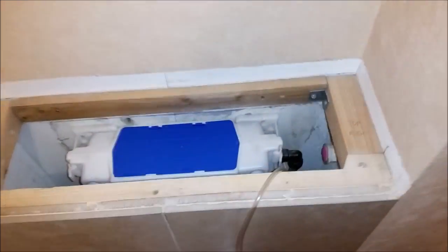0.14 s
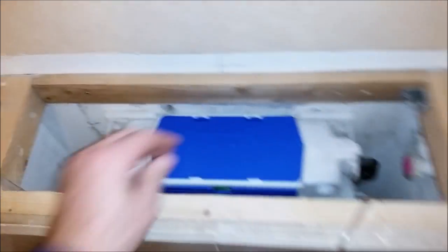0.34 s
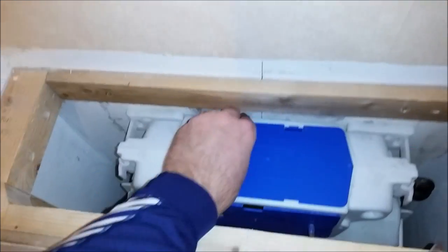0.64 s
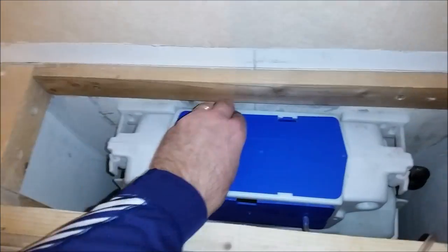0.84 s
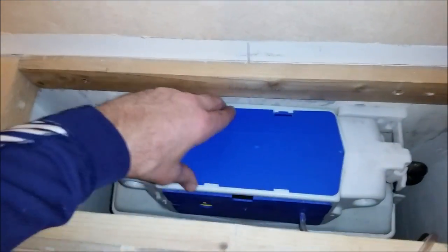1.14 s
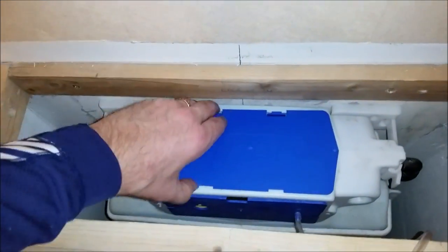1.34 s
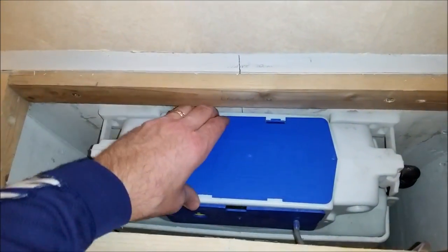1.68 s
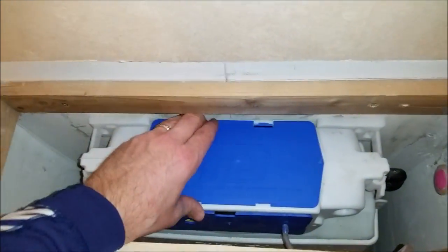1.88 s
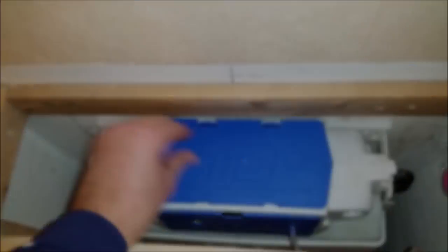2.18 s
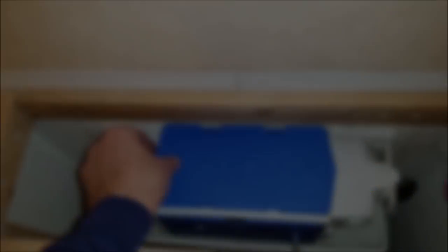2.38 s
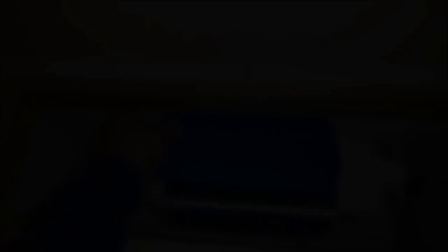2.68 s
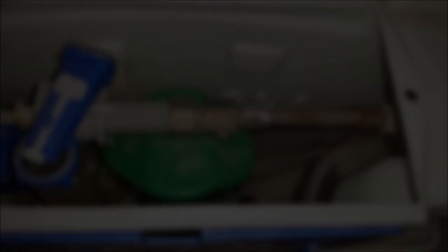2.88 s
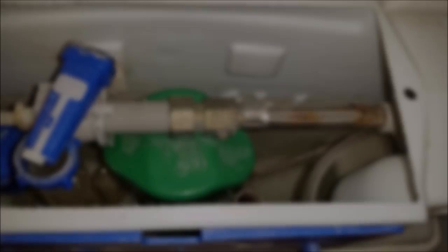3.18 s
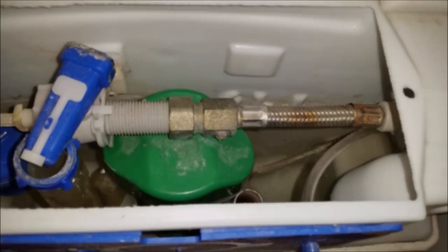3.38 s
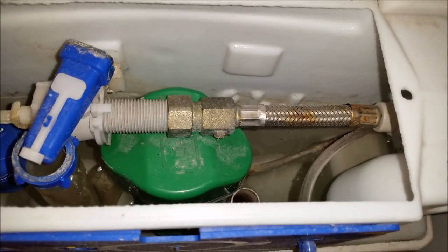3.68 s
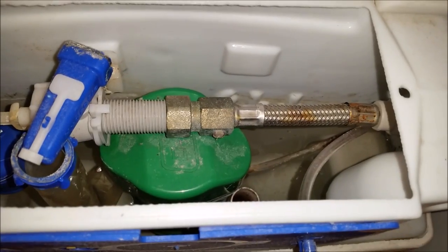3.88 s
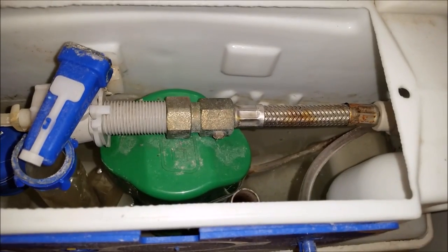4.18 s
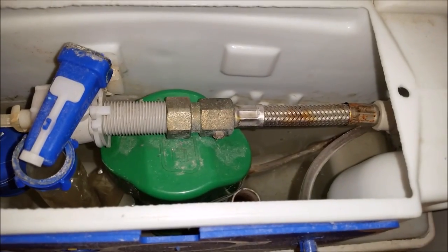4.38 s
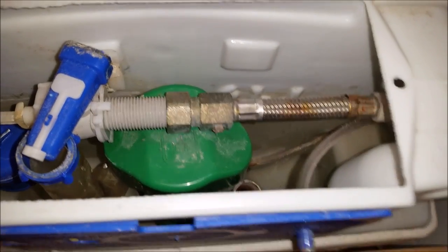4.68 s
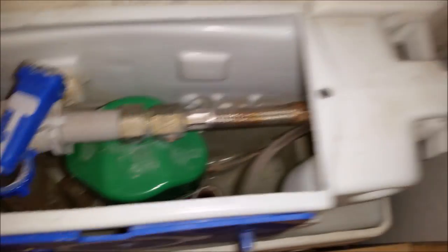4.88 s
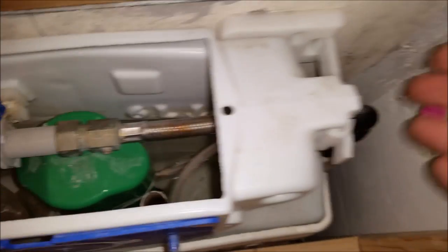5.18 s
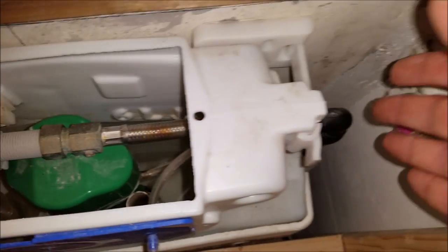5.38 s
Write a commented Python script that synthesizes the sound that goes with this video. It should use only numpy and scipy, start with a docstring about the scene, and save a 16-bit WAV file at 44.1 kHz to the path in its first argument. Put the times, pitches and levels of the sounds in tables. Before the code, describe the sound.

A plastic toilet cistern lid is worked loose by hand, close to the microphone in a small bathroom with a short echo. It opens with a soft hollow knock and a finger brush, then a light click at about 0.5 seconds. Near 1 second the lid rubs and knocks with a very short groan, followed by gentle, dull nudges. A firm knock lands at 2 seconds. The loudest clatter comes around 2.3 seconds and again from 2.7 to 2.8: quick cracks, hollow knocks and brief grating scrapes as the rim snaps off its catches. At 3.3 seconds a low thump bumps the microphone on the left, and around 3.5 seconds there are light clicks, a brush and a softer bump. Thin hiss then fades, leaving faint low handling rumble, and a sleeve swishes softly past from 5 to 5.5 seconds.

```python
"""A plastic toilet cistern lid, worked loose by hand in a boxed-in recess: it rubs, knocks and snaps free.
Each contact rings the hollow tank and the lid, with a dry crack that the small bathroom answers.
Stick-slip makes the rubs and a short groan; the rim grates on its catches. Fingers brush the plastic,
hard parts click, the camera body takes soft bumps and a sleeve slides past, over low rumble and thin hiss."""
import sys
import numpy as np
from scipy import signal
from scipy.fft import rfft, irfft, next_fast_len
from scipy.io import wavfile
from scipy.ndimage import uniform_filter1d, minimum_filter1d, map_coordinates

SR = 44100
rng = np.random.default_rng(int(sys.argv[2]) if len(sys.argv) > 2 else 0)


def to_wav(s):
    """Save 16-bit WAV."""
    ch = np.atleast_2d(s).T  # columns
    pcm = np.round(np.clip(ch, -1, 1) * 32767)  # PCM
    wavfile.write(sys.argv[1], SR, pcm.astype(np.int16))


N = 243873
EVENT_N, ATTACK_N = SR * 6 // 10, SR // 50
SCENE_S, EVENT_S = np.arange(N) / SR, np.arange(EVENT_N) / SR
RECESS = rng.standard_normal((2, EVENT_N))  # reflection pattern common to all blows


def amp(db):
    """Decibels to gain."""
    return 10 ** (np.asarray(db) / 20)


def unit(x, size=None):
    """Scale to rms 1 over the first size samples."""
    return x / np.sqrt(np.mean(x[..., :size] ** 2) + 1e-20)


def wobble(rate_hz, size=N):
    """Smooth random curve, rate_hz knots a second."""
    knots = rng.standard_normal(int(size * rate_hz / SR) + 4)
    return map_coordinates(knots, [np.arange(size) * rate_hz / SR])


def filtered(x, response):
    """Apply a frequency response."""
    padded = next_fast_len(x.shape[-1] + 4096)
    spectrum = rfft(x, padded) * response(np.fft.rfftfreq(padded, 1 / SR))
    return irfft(spectrum, padded)[..., :x.shape[-1]]


def highpass(x, hz, order):
    """Butterworth low cut."""
    return signal.sosfilt(signal.butter(order, hz, btype="highpass", fs=SR, output="sos"), x)


def colour(points):
    """Response through (f/Hz, level/dB) points, falling off past the ends."""
    hz, db = np.transpose(points)
    hz, db = np.r_[hz[0] / 2, hz, hz[-1] * 2], np.r_[db[0] - 40, db, db[-1] - 40]
    return lambda f: amp(np.interp(np.log(f + 1), np.log(hz), db))


def resonances(peaks):
    """Response of (f/Hz, width/Hz, level/dB) resonators, alternating in sign."""
    return lambda f: sum((-1) ** k * amp(db) * 1j * f * width / (hz * hz - f * f + 1j * f * width)
                         for k, (hz, width, db) in enumerate(peaks))


def noise(response, corr, size=N, common=0):
    """Coloured stereo noise, rms 1; corr sets left-right correlation, common adds a shared pattern."""
    mid, side = filtered(rng.standard_normal((2, size)) + common, response)
    angle = np.arccos(corr) / 2
    return unit(np.cos(angle) * mid + np.sin(angle) * np.array([side, -side]))


def pan(db):
    """Channel gains for a left-minus-right level."""
    gains = amp([[db / 2], [-db / 2]])
    return gains / gains.mean()


def add(track, at_s, sound):
    """Mix a sound in at at_s."""
    start = round(at_s * SR)
    track[:, start:start + sound.shape[-1]] += sound[..., :N - start]


def burst(response, corr, t60_s, room_db, room_t60_s, ragged_db, rise_s=0.00016, recess=0):
    """Dense ring of a contact: quick and ragged in the recess, then a smooth room tail."""
    near = amp(-60 * EVENT_S / t60_s + ragged_db * wobble(900, EVENT_N))
    room = amp(room_db - 60 * EVENT_S / room_t60_s)
    decay = noise(response, corr, EVENT_N, recess * RECESS) * np.hypot(near, room)
    return unit(decay, ATTACK_N) * (1 - np.exp(-EVENT_S / rise_s))


def ring(modes, favoured_hz, rise_s, favour_db, scatter_db):
    """Struck modes, lifted within about 10 % of favoured_hz; left and right slightly out of phase."""
    hz, db, t60_s = np.transpose(modes)[:, :, None]
    strength, detune, spread = rng.standard_normal((3, len(modes), 1))
    db = db + favour_db * np.exp(-(np.log(hz / favoured_hz) / .1) ** 2) + scatter_db * strength
    phase = 2 * np.pi * (hz * (1 + .002 * detune) * EVENT_S + rng.random(hz.shape))
    lag = 2 * np.pi * hz * spread * 5e-5
    fade = amp(db - 60 * EVENT_S / t60_s)
    pair = np.array([(fade * np.sin(phase + side * lag)).sum(0) for side in (1, -1)])
    return unit(pair, ATTACK_N) * (1 - np.exp(-EVENT_S / rise_s))


def stroke(length_s, grain_db, grain_hz):
    """Grainy arched envelope of a slide."""
    arch = np.sqrt(np.sin(np.pi * np.minimum(EVENT_S / length_s, 1)).clip(0))
    return arch * amp(grain_db * wobble(grain_hz, EVENT_N))


def late_fade(from_s=3.2, db_per_s=34):
    """Gain that holds, then fades away from 3.2 s, taking hiss and faint rubbing with it."""
    return amp(-db_per_s * np.maximum(SCENE_S - from_s, 0))


# modes of the hollow tank and the stiffer lid: f/Hz, level/dB, t60/s
TANK_MODES = [(213.7, -7.5, 0.35), (245.5, 0, 0.17), (296.5, -3, 0.17), (314.7, -1.5, 0.21),
              (351, -14, 0.55), (374, 0, .17), (432, 1, 0.17), (462.2, -8.5, 0.18)]
LID_MODES = [(576, -2, 0.17), (650.2, -5, 0.089), (741.4, -3, 0.13), (764.3, -4, 0.086), (808, -7.5, 0.083),
             (873.6, -16, 0.2), (930, -19.5, 0.081), (1002, -10.5, 0.09), (1070, -15.5, 0.082)]
# rim and catch resonances: f/Hz, width/Hz, level/dB
RIM_PEAKS = [(1149, 7.3, 3.5), (1280, 30, 13), (1378, 20, 7.5), (1640, 300, -2.5), (1673, 25, 11),
             (1795, 35, -1), (1960, 20, 4), (2120, 200, -5.5), (2370, 38, 1.5), (2470, 120, -4),
             (2706, 55, 2.5), (2825, 14, -8), (2950, 50, 0.5), (4220, 800, -9)]
# noise spectra of tank, lid and snap: f/Hz, level/dB
TANK_SPECTRUM = [(60, -31), (170, -27.5), (230, -1.5), (450, -7.5), (600, -13.5), (900, -51.5)]
LID_SPECTRUM = [(350, -33.5), (550, -4), (780, -7), (1050, -16), (1500, -29)]
SNAP_SPECTRUM = [(2200, -36.5), (3500, -0.5), (4300, 0.5), (5300, -2.5), (6500, -8.5), (8500, -7.5),
                 (11000, -17.5), (15500, -20)]


def contact(ring_db, crack_db, snap_db, favoured_hz, rise_s):
    """One contact cracks at the rim; low favoured pitches ring the tank, high ones the lid."""
    def rim(f):
        return resonances(RIM_PEAKS)(f) / np.sqrt((1 + (1050 / (f + 1)) ** 8) * (1 + (f / 4800) ** 8))

    tank = amp(-2) * ring(TANK_MODES, favoured_hz, rise_s, favour_db=13.5, scatter_db=2)
    tank += amp(-6.5) * burst(colour(TANK_SPECTRUM), corr=.88, t60_s=.028, room_db=-18,
                              room_t60_s=.13, ragged_db=3, rise_s=rise_s)
    lid = amp(.5) * ring(LID_MODES, favoured_hz, rise_s, favour_db=17.5, scatter_db=5)
    lid += amp(-7) * burst(colour(LID_SPECTRUM), corr=.72, t60_s=.037, room_db=-7.5,
                           room_t60_s=.26, ragged_db=8, rise_s=rise_s)
    crack = burst(rim, corr=.05, t60_s=.058, room_db=-14.5,
                  room_t60_s=.21, ragged_db=6.5, rise_s=rise_s, recess=.76)
    snap = burst(colour(SNAP_SPECTRUM), corr=.042, t60_s=.11, room_db=-13.5,
                 room_t60_s=.34, ragged_db=2.5, rise_s=rise_s, recess=1.2)
    edge = amp(crack_db - .7) * crack * pan(.42) + amp(snap_db - 4) * snap * pan(-3.5)
    split_hz = 547
    lid_share = 1 / (1 + (split_hz / favoured_hz) ** 3.9)
    return amp(ring_db) * (np.sqrt(1 - lid_share) * tank + np.sqrt(lid_share) * lid) + edge


# lid blows on the tank: t/s, ring level/dB, crack level/dB, snap level/dB, favoured f/Hz
LID_KNOCKS = [(0.0, -24.5, -38.5, -46.5, 293), (0.634, -43, -51.5, -70, 1050),
              (0.964, -22.5, -35, -44.5, 570), (0.972, -22, -34, -48, 287), (0.988, -26, -40, -39.5, 330),
              (1.866, -35, -58, -73.5, 392.8), (1.934, -34, -52.5, -67.5, 430),
              (2.036, -21, -24, -40.5, 764), (2.046, -16, -30.5, -36.5, 764),
              (2.074, -31, -45.5, -59.5, 789), (2.247, -18, -23, -26.5, 430), (2.26, -20, -30, -28.5, 840),
              (2.268, -27.5, -35, -33, 250), (2.283, -28, -28, -35, 980), (2.295, -28.5, -31, -34, 403),
              (2.31, -19, -24, -27, 444), (2.326, -23, -27.5, -48, 446.2), (2.428, -31.5, -40, -44.5, 720),
              (2.476, -39.5, -52, -53, 446), (2.557, -43, -54.5, -63, 430), (2.611, -41.5, -43, -53, 580),
              (2.681, -23.5, -29, -38, 736), (2.7085, -25, -21, -35.5, 1000),
              (2.714, -20.5, -28.5, -36, 769), (2.738, -33.5, -41, -36.5, 761),
              (2.776, -20.5, -34.5, -40.5, 450), (2.7825, -21.5, -30, -28.5, 750),
              (2.799, -29.5, -34, -46, 440), (2.961, -37, -53, -54, 475)]
# hand pushes on the lid: t/s, ring level/dB, favoured f/Hz
LID_NUDGES = [(0.424, -33.5, 290), (0.836, -29.5, 600), (0.892, -28, 315), (0.928, -25.5, 570),
              (1.128, -40, 420), (1.192, -31, 577), (1.21, -32, 432), (1.344, -40, 587),
              (1.496, -34.5, 235), (1.587, -37, 590), (1.793, -36.5, 311), (2.026, -28.5, 750),
              (2.524, -40.5, 754), (2.622, -26.5, 432), (3.148, -36, 290)]


def knocks_and_nudges():
    """Hard blows start at once and crack; soft pushes swell and stay dull."""
    out = np.zeros((2, N))
    for at_s, ring_db, crack_db, snap_db, hz in LID_KNOCKS:
        add(out, at_s, contact(ring_db, crack_db, snap_db, hz, rise_s=.00064))
    for at_s, db, hz in LID_NUDGES:
        add(out, at_s, contact(db, crack_db=db - 17.5, snap_db=db - 24, favoured_hz=hz, rise_s=.0098))
    return out


# hand strokes on the lid: peak t/s, level/dB
HAND_RUBS = [(0.74, -53), (0.94, -30.5), (1.65, -41), (2.0, -39), (2.42, -45), (2.72, -33), (3.01, -53)]


def rubbing(press_db_per_s=99, relax_db_per_s=169.5, touch_db=-58.5, slips_per_s=400):
    """The lid sticks and slips under the hand; tiny slips ring tank, lid and rim."""
    strokes_db = [db - np.maximum(press_db_per_s * (at_s - SCENE_S), relax_db_per_s * (SCENE_S - at_s))
                  for at_s, db in HAND_RUBS]
    pressure = np.hypot(amp(np.max(strokes_db, axis=0)), amp(touch_db) * late_fade())
    slips = (rng.random(N) < slips_per_s / SR) * rng.standard_normal(N)
    shell = resonances([(hz, 4 / t60_s, db) for hz, db, t60_s in TANK_MODES + LID_MODES])
    body = unit(filtered(slips, lambda f: shell(f) / (1 + (190 / (f + 1)) ** 4)))
    rasp = noise(resonances(RIM_PEAKS), corr=.16) * amp(2.4 * wobble(120))
    return amp(-4.5) * pressure * (body + amp(-14) * rasp)


# handling envelope: t/s, sway level/dB, rumble level/dB
HANDLING_LEVELS = [(0.0, -64, -55), (1.49, -72, -60.5), (2.06, -64.5, -55.5), (3.48, -54.5, -55.5),
                   (3.82, -66, -69), (4.61, -59, -67), (4.82, -61.5, -67), (5.53, -54, -58.5)]
# sway and rumble spectra: f/Hz, level/dB
SWAY_SPECTRUM = [(18, -17), (35, -3), (62, 5), (90, -20.5)]
RUMBLE_SPECTRUM = [(55, -11), (75, -6), (120, -1), (190, -4.5), (270, -12), (400, -20), (650, -30.5)]


def handling():
    """The camera's slow sway, with handling rumble above it."""
    at_s, *levels_db = np.transpose(HANDLING_LEVELS)
    sway_db, rumble_db = (np.interp(SCENE_S, at_s, db) for db in levels_db)
    sway = amp(sway_db + 4 + .8 * wobble(13)) * noise(colour(SWAY_SPECTRUM), corr=.39)
    rumble = amp(rumble_db + 4.5 + 1.1 * wobble(11)) * noise(colour(RUMBLE_SPECTRUM), corr=.35)
    return sway * pan(-2.5) + rumble


# hiss and still-room spectra: f/Hz, level/dB
HISS_SPECTRUM = [(700, 9.5), (1500, 1), (2500, -8), (3200, -8.5), (4400, 2.5), (5100, -3), (6200, -18.5),
                 (8100, -1.5), (10000, -19), (12000, -31.5), (15000, -16)]
ROOM_SPECTRUM = [(600, -20.5), (1400, -11.5), (2400, -12), (3200, -18.5), (3700, -4), (3980, 2), (4400, -8),
                 (5200, -24.5), (10000, -29), (12000, -27), (15500, -28.5)]


def room_hiss():
    """A thin hiss holds, then fades to the still room."""
    hiss = amp(-61.5) * late_fade() * noise(colour(HISS_SPECTRUM), corr=.14)
    return hiss + amp(-78.5) * noise(colour(ROOM_SPECTRUM), corr=.078)


# camera body bumps: t/s, level/dB, f/Hz, t60/s, pan/dB
CAMERA_BUMPS = [(0.002, -26, 121, 0.061, -2), (0.173, -33.5, 262, 0.0084, -18.5),
                (1.45, -33.5, 314, 0.01, 9), (1.681, -33, 373, 0.0056, 2.5), (1.774, -31, 287, 0.0055, 12),
                (3.284, -4.5, 124, 0.008, -17.5), (3.314, -24, 127, 0.017, 12),
                (3.357, -33, 286, 0.013, -13), (3.558, -19.5, 92, 0.017, -21),
                (3.579, -26.5, 204, 0.014, -15), (4.628, -35, 117.7, 0.032, 14)]


def bumps():
    """A finger bumps the camera: a few low cycles swell and die, mostly on one side."""
    out = np.zeros((2, N))
    for at_s, db, hz, t60_s, pan_db in CAMERA_BUMPS:
        push = np.sin(2 * np.pi * hz * EVENT_S) * EVENT_S * amp(-60 * EVENT_S / t60_s)
        add(out, at_s, amp(db - 5) * push / np.abs(push).max() * pan(pan_db))
    return out


# hard little ring, also in clicks: f/Hz, width/Hz, level/dB
PING_PEAKS = [(1810, 170, -13.5), (2360, 80, -2), (2493, 130, -7.5), (5028, 55, -8)]
# sizzle spectrum, also in clicks: f/Hz, level/dB
SIZZLE_SPECTRUM = [(5500, -22), (8000, -7), (10500, 0.5), (11700, -2.5), (12600, -0.5), (13800, -5.5),
                   (15000, -26)]
# finger brushes: t/s, level/dB, length/s, relative squeak/dB, relative sizzle/dB
FINGER_BRUSHES = [(0.053, -52, 0.1, -29, -27), (0.439, -60, .04, -17, -12), (0.542, -52, .1, -2.5, -4.5),
                  (0.697, -57.5, 0.045, -11, -13), (2.103, -57.5, 0.068, 5, -5.5),
                  (3.221, -55, 0.089, -14, -12), (3.533, -47.5, 0.07, -8.5, 2)]
# skin-on-plastic spectrum: f/Hz, level/dB
BRUSH_SPECTRUM = [(800, -3.5), (2500, -7.5), (3300, -4), (4500, 2), (6500, -4), (9000, -3), (11500, -24.5),
                  (15500, -12.5)]


def brushes(room_db=-10, room_t60_s=.35):
    """Skin slides over plastic in short grainy swishes that can squeak and fade into the room."""
    out = np.zeros((2, N))
    responses = colour(BRUSH_SPECTRUM), resonances(PING_PEAKS), colour(SIZZLE_SPECTRUM)
    for at_s, db, length_s, squeak_db, sizzle_db in FINGER_BRUSHES:
        swish, squeak, sizzle = (noise(response, corr=.11, size=EVENT_N) for response in responses)
        friction = swish + amp(squeak_db) * squeak + amp(sizzle_db) * sizzle
        direct = stroke(length_s, grain_db=2, grain_hz=300)
        tail_db = room_db - 60 * np.maximum(EVENT_S - length_s, 0) / room_t60_s
        room = np.minimum(EVENT_S / length_s, 1) * amp(tail_db)
        add(out, at_s, amp(db) * np.hypot(direct, room) * friction * pan(-2.7))
    return out


# light clicks: t/s, ping level/dB, tick level/dB, sizzle level/dB, t60/s
HARD_CLICKS = [(0.0925, -78, -65, -56, 0.01), (0.415, -65, -51, -71, 0.06), (0.551, -36, -43.5, -52, 0.11),
               (2.228, -54.5, -51.5, -64, 0.059), (3.245, -62, -44, -74.5, 0.08),
               (3.283, -70, -55, -58.5, 0.011), (3.366, -66.5, -62, -78, .02),
               (3.537, -67.5, -48, -35.5, 0.064), (3.573, -65, -40.5, -36, 0.018),
               (3.582, -61, -46, -48.5, 0.027)]
# tick spectrum: f/Hz, level/dB
TICK_SPECTRUM = [(400, 3), (1000, -6), (2000, -4.5), (3200, -12), (4000, -1), (5000, -8), (5800, -16.5),
                 (7200, -12), (9500, -29)]


def clicks():
    """Small hard parts tap together: a clean ping, a treble tick and a room tail."""
    out = np.zeros((2, N))
    modes = [(hz, db, 4 / width_hz) for hz, width_hz, db in PING_PEAKS]  # narrower rings longer
    for at_s, ping_db, tick_db, sizzle_db, t60_s in HARD_CLICKS:
        ping = ring(modes, favoured_hz=PING_PEAKS[1][0], rise_s=.0007, favour_db=5.5, scatter_db=-1)
        ping += amp(-7) * burst(resonances(PING_PEAKS), corr=.3, t60_s=.1, room_db=-9,
                                room_t60_s=.25, ragged_db=2.5)
        tick = burst(colour(TICK_SPECTRUM), corr=.61, t60_s=t60_s, room_db=-16,
                     room_t60_s=.34, ragged_db=0, recess=.94)
        sizzle = burst(colour(SIZZLE_SPECTRUM), corr=.3, t60_s=t60_s, room_db=-20,
                       room_t60_s=.26, ragged_db=2.5, recess=1.5)
        treble = amp(tick_db) * tick + amp(sizzle_db) * sizzle
        add(out, at_s, amp(ping_db) * ping * pan(4.2) + treble * pan(-2))
    return out


def judder(at_s, length_s, rate_hz, db, rim_db):
    """The lid gives way in a quick run of slips: a short hollow groan."""
    gaps_s = rng.uniform(.7, 1.3, 16) / rate_hz
    slip_s = np.cumsum(gaps_s) - gaps_s[0]
    slips = np.zeros((1, EVENT_N))
    slips[0, (slip_s[slip_s < length_s] * SR).astype(int)] = 1
    shell = resonances([(hz, 3 / t60_s, mode_db) for hz, mode_db, t60_s in TANK_MODES + LID_MODES])
    body = unit(filtered(slips, shell), 2 * ATTACK_N)
    envelope = np.interp(EVENT_S, [0, .004, length_s, 2 * length_s], [.34, 1, .714, .006])
    rasp = noise(resonances(RIM_PEAKS[:7]), corr=.84, size=EVENT_N) * envelope
    out = np.zeros((2, N))
    add(out, at_s, amp(db) * (body + amp(rim_db) * rasp))
    return out


# rim drags: t/s, length/s, level/dB
RIM_SCRAPES = [(2.25, 0.068, -33), (2.682, 0.055, -37.5)]


def scrapes():
    """The rim grates along the catches: a ragged rasp that swells and fades."""
    out = np.zeros((2, N))
    for at_s, length_s, db in RIM_SCRAPES:
        rim = noise(resonances(RIM_PEAKS), corr=.1, size=EVENT_N)
        edge = noise(colour(SNAP_SPECTRUM), corr=.1, size=EVENT_N)
        add(out, at_s, amp(db) * stroke(length_s, grain_db=4, grain_hz=500) * (rim + amp(-5.5) * edge))
    return out


# sleeve passes: centre t/s, level/dB
SLEEVE_SWISHES = [(5.011, -67), (5.15, -60), (5.322, -59), (5.499, -60.5)]
# cloth spectrum: f/Hz, level/dB
CLOTH_SPECTRUM = [(300, 15.5), (700, -3), (1000, 0), (1150, 12), (1350, -5), (1680, -3), (1850, 14.5),
                  (2050, -2), (3200, -9), (4300, 4.5), (5600, -13), (6800, -5), (8200, -14), (10000, 3.5),
                  (11000, -9), (12000, 3), (14500, -18), (15500, -31.5)]


def sleeve(half_length_s=.066):
    """Cloth slides past in soft, overlapping swishes."""
    motion = sum(amp(db) * np.exp(-((SCENE_S - at_s) / half_length_s) ** 2)
                 for at_s, db in SLEEVE_SWISHES)
    return motion * amp(.9 * wobble(54)) * noise(colour(CLOTH_SPECTRUM), corr=.17)


def scene():
    """Stereo sum of all sources."""
    cistern = knocks_and_nudges() + rubbing() + scrapes()
    cistern += judder(at_s=.96, length_s=.03, rate_hz=150, db=-26, rim_db=-11.5)
    cistern = highpass(cistern, hz=190, order=3)  # a small box radiates little below its lowest mode
    return cistern + clicks() + brushes() + bumps() + sleeve() + handling() + room_hiss()


def record(dry, ceiling=.53, limiter_n=177, top_hz=15800):
    """Camera chain: bass cut, peak limiter, band limit."""
    thinned = highpass(dry, hz=40, order=2)
    needed_gain = np.minimum(1, ceiling / (np.abs(thinned).max(0) + 1e-9))
    gain = uniform_filter1d(minimum_filter1d(needed_gain, limiter_n), limiter_n)
    return filtered(thinned * gain, lambda f: f < top_hz)


dry = scene()
out = record(dry)
to_wav(out)
```